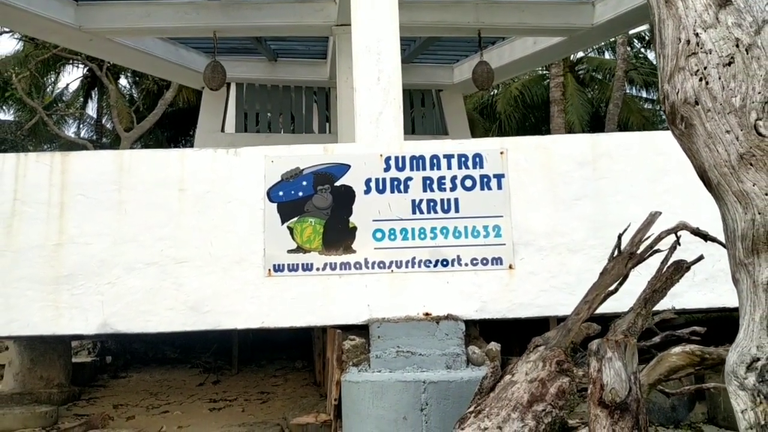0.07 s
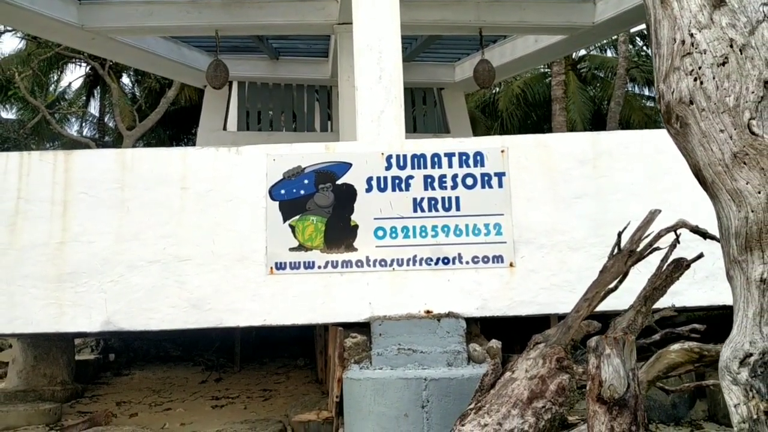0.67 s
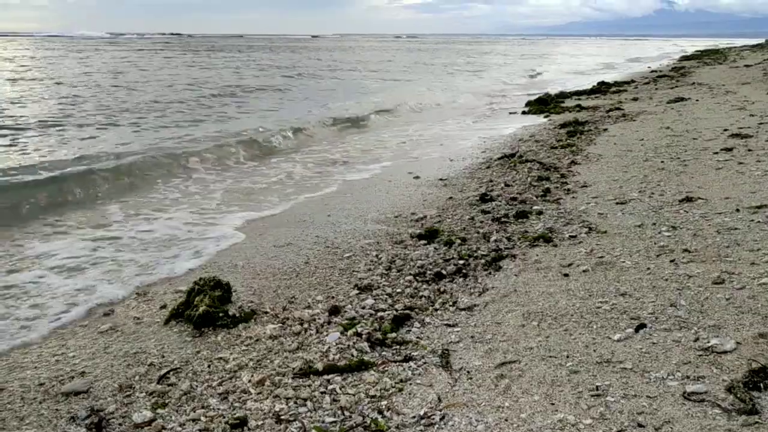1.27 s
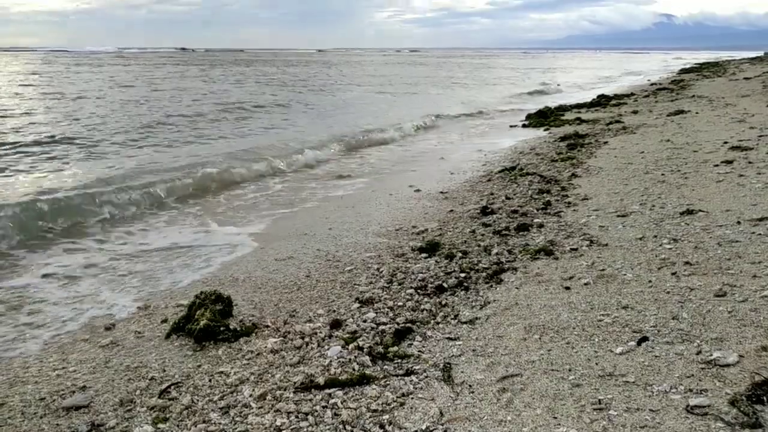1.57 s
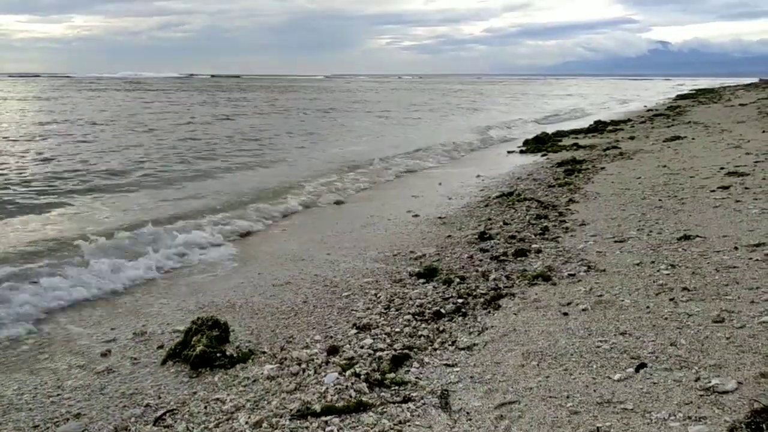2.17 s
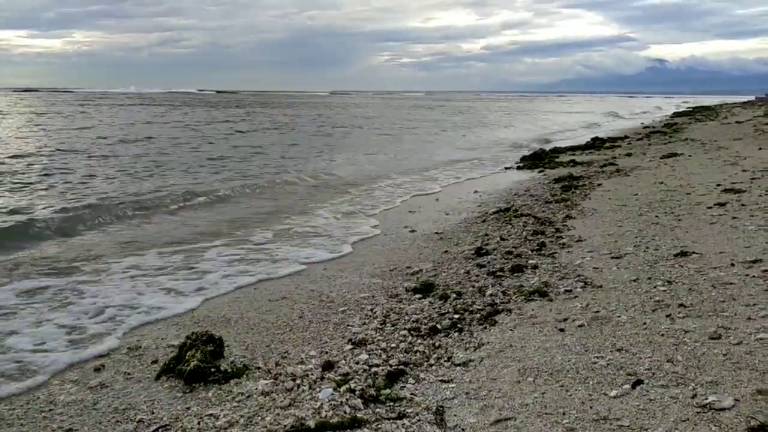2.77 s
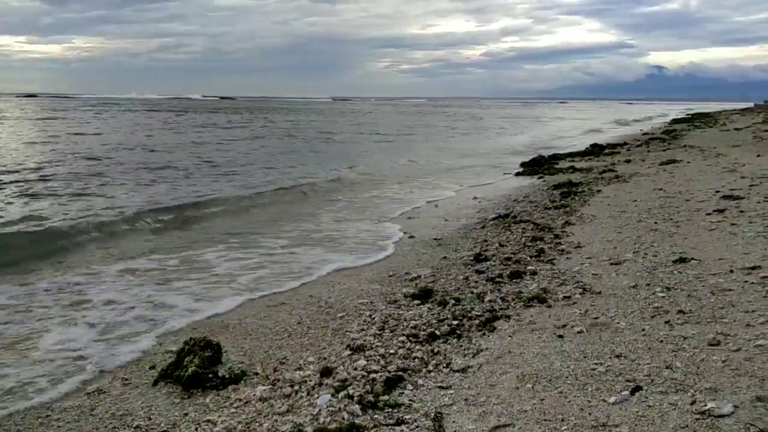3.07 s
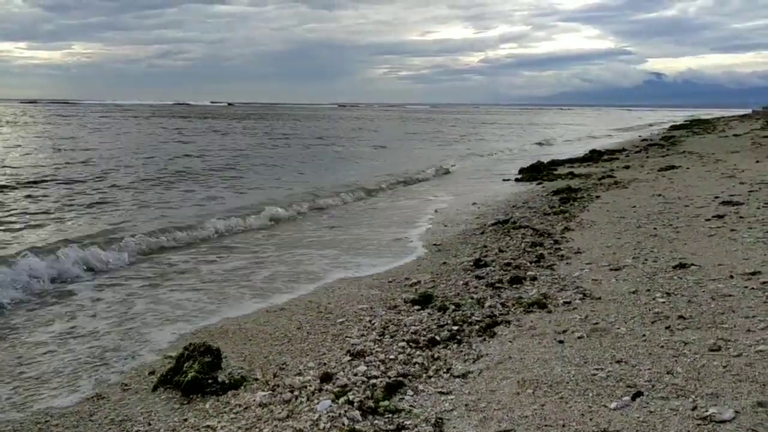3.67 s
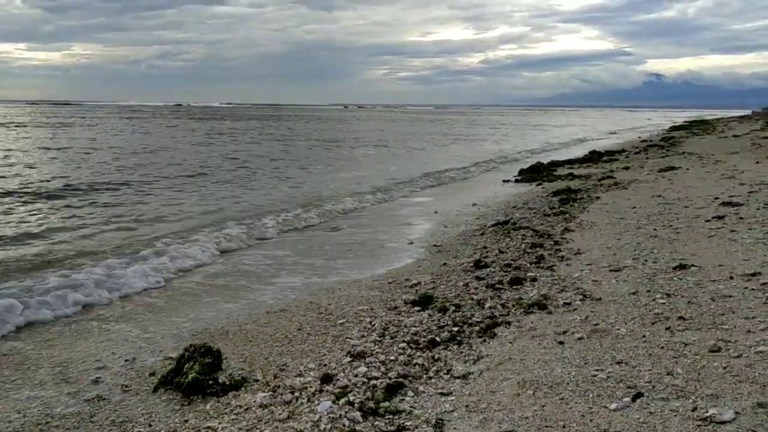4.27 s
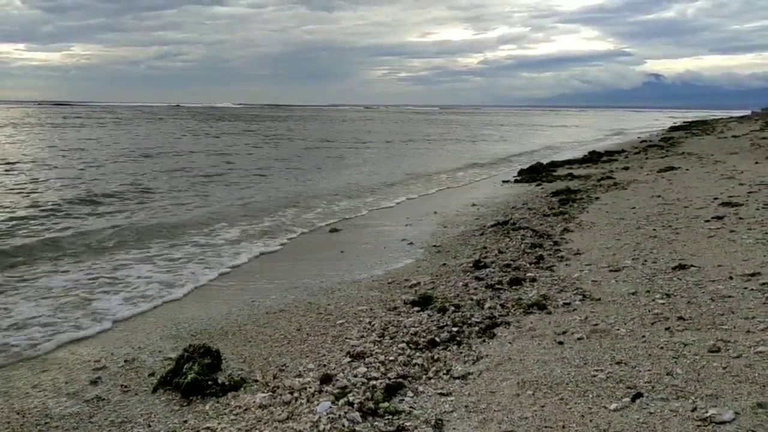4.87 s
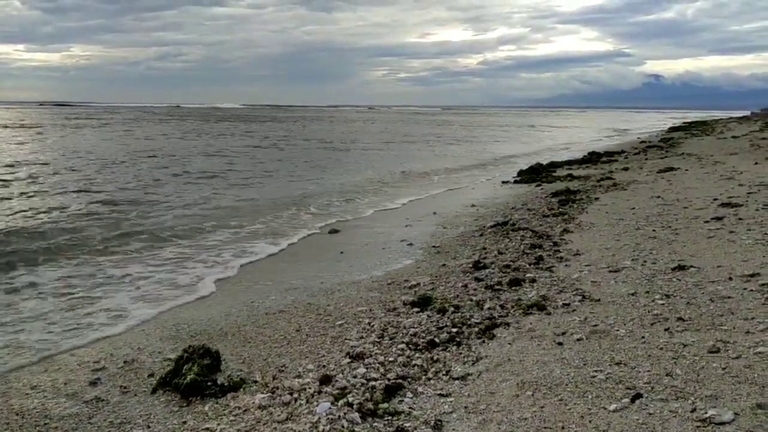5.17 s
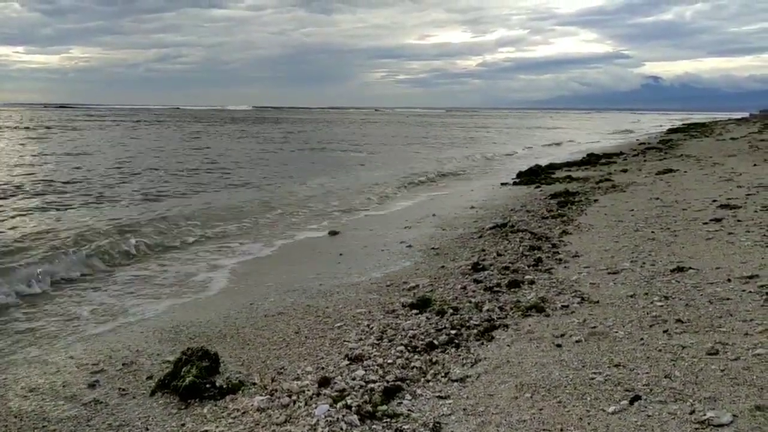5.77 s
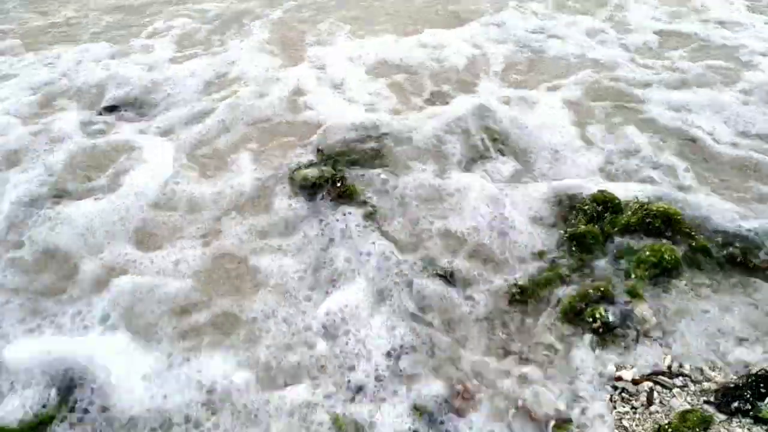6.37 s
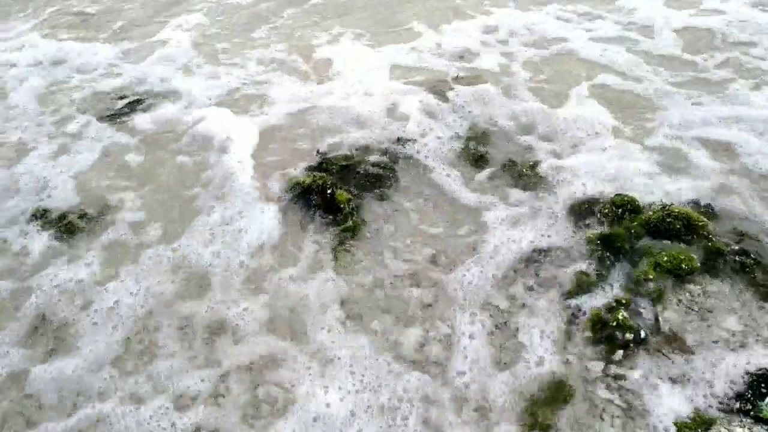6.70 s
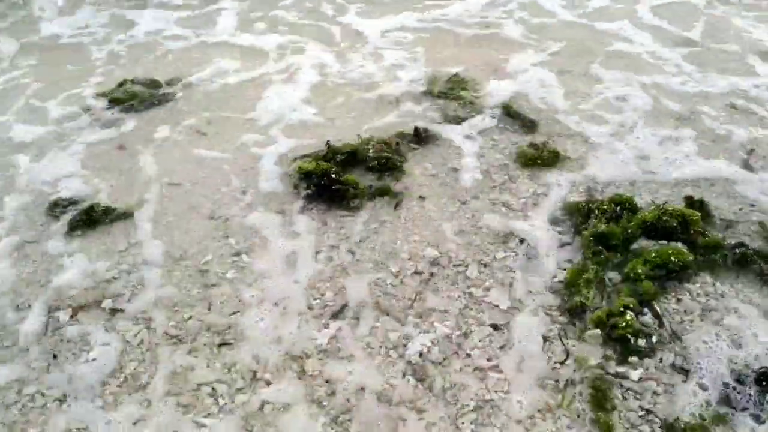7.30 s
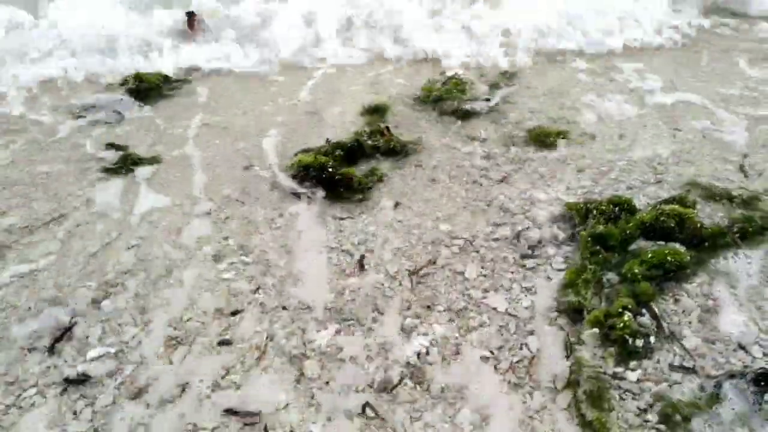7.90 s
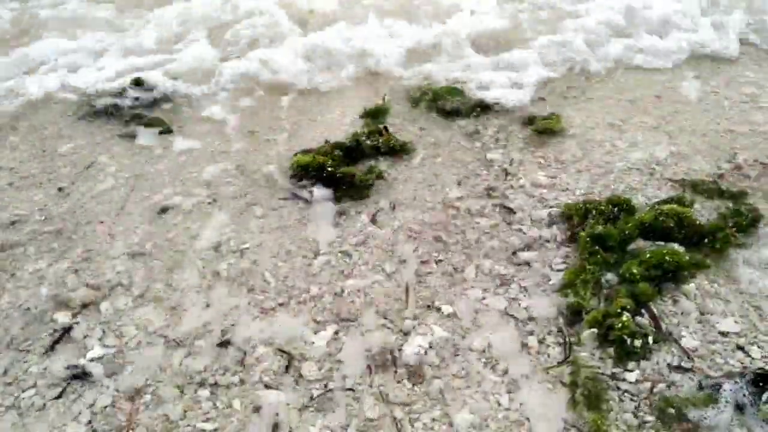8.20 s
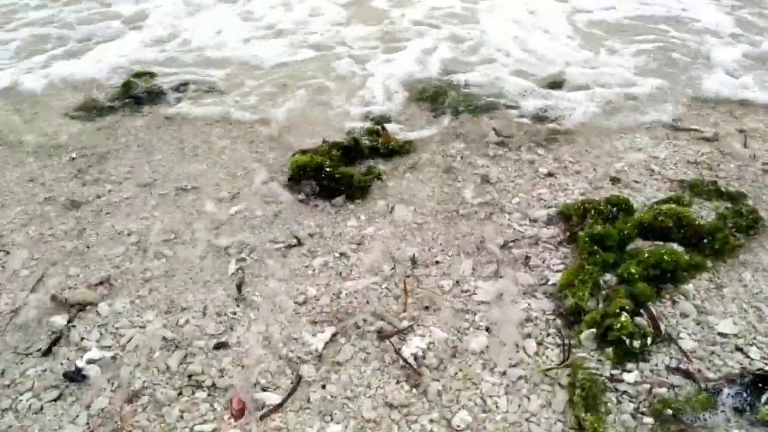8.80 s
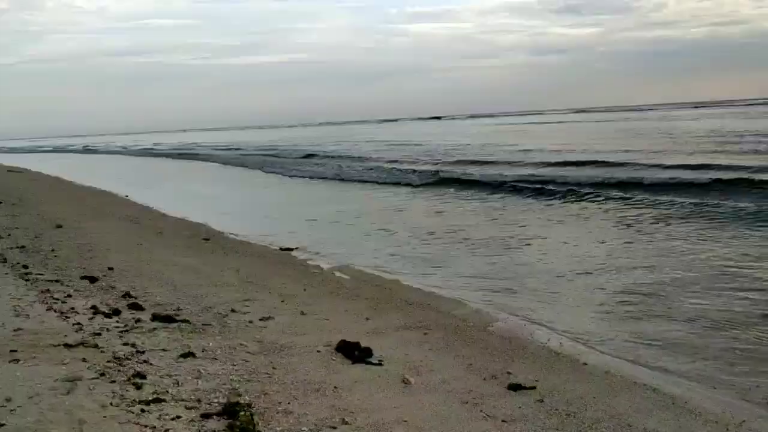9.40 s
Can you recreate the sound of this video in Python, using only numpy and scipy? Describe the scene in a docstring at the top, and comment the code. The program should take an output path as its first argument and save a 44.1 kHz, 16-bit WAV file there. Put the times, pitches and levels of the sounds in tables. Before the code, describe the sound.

For the first second or so, low gusts of wind buffet the microphone under a thin, high hiss. At about 1.2 seconds the sound cuts to a spot a few steps from the water on a shell beach. A small wave breaks at around 1.5 seconds, churns and runs out as fizzing foam. A second spills from 3 to 4 seconds with wet slaps and a gulp, and a softer one follows between 5 and 6. Just after 6.2 seconds there is a very short hush, and the water returns right below the microphone. Two waves land one on the other from about 7 to 7.7 seconds, the fullest moment, with low thuds, splashes and hollow gulps, then drain away hissing. A gentler wave washes in at around 9 seconds, and the sound fades quickly after 9.5. Far surf and wind rumble faintly underneath, all in mono.

```python
"""Small waves on a shell beach

Heard in mono from three places in turn: by the palms, where wind buffets the microphone under a thin
hiss, then a few steps from the water, then right above the waves as they run up the shore. Each wave
spills at its crest, plunges, churns and runs out as fizzing foam, all made of ringing bubbles and noise.
Falling water slaps and thuds, trapped air gulps, and far surf and wind rumble underneath."""
import sys
import numpy as np
from scipy import signal
from scipy.fft import rfft, irfft
from scipy.io import wavfile
from scipy.ndimage import uniform_filter1d

SR = 44100
rng = np.random.default_rng(int(sys.argv[2]) if len(sys.argv) > 2 else 0)


def write(x):
    x = np.atleast_2d(x).T
    wavfile.write(sys.argv[1], SR, np.round(np.clip(x, -1, 1) * 32767).astype(np.int16))


N = 425565
TIME, HZ = np.arange(N) / SR, np.fft.rfftfreq(N, 1 / SR)

# pitch ranges of a wave's four stages (plunge, churn, spill, foam): low f/Hz, high f/Hz
STAGE_BANDS = [(170, 400), (420, 1400), (1600, 3000), (4000, 15000)]


def gain_of(db):
    """Turns decibels into a number to multiply a sound by."""
    return 10 ** (np.asarray(db) / 20)


def evened(x):
    """Scales a signal so that its average strength (rms) is 1."""
    return x / np.sqrt(np.mean(x ** 2) + 1e-20)


def add(mix, start_s, sound):
    """Mixes a sound in at the given time."""
    part = mix[round(start_s * SR):][:len(sound)]
    part += sound[:len(part)]


def coloured(x, colour, band=(0, SR)):
    """Shapes x by a tone colour (rows of f/Hz, level/dB), with strength 1 inside the band."""
    f, db = np.transpose(colour)
    knots = np.log(np.r_[f[0] / 2, f, f[-1] * 2])
    spectrum = rfft(x) * gain_of(np.interp(np.log(HZ + 1), knots, np.r_[db[0] - 40, db, db[-1] - 40]))
    inside = (HZ >= band[0]) & (HZ <= band[1])
    return irfft(spectrum, N) * N / np.sqrt(2 * np.sum(abs(spectrum[inside]) ** 2))


def wander(rate_hz):
    """A random wobble of strength 1, up to about the given rate."""
    return evened(irfft(rfft(rng.standard_normal(N)) * (HZ > 2) / (1 + (HZ / rate_hz) ** 2), N))


def palm_wind():
    """Wind and far surf by the palms; each gust on the microphone is a big swirl that breaks up."""
    # tone colour of the wind and surf: f/Hz, level/dB
    colour = [(20, 2), (50, -6), (90, -0.5), (130, -5), (185, -3), (250, -4), (500, -10), (800, -13.5),
              (1000, -16), (1800, -19.5), (2600, -20), (3600, -28), (6000, -35), (15000, -37.5)]
    # the strongest gusts: peak t/s, level/dB, f/Hz, half length/s
    gusts = [(.056, -34, 100.5, .029), (.155, -31, 87, .021), (0.288, -30, 80.7, 0.018),
             (0.375, -29, 94.3, 0.017), (0.504, -29, 110, 0.017), (0.697, -32, 129.5, .034),
             (0.92, -30.5, 174, 0.1), (1.05, -33, 170, .02), (1.147, -27.5, 70.3, 0.045)]
    wind = gain_of(-34) * coloured(rng.standard_normal(N), colour) * gain_of(0.94 * wander(28))
    swirl_time = np.cumsum(1 + 0.285 * wander(60)) / SR  # an uneven clock makes the pitch waver
    flutter = coloured(rng.standard_normal(N), [(40, 8), (200, 2), (400, -2), (800, -17)])
    for peak_s, db, hz, length in gusts:
        near = slice(max(round((peak_s - 4 * length) * SR), 0), round((peak_s + 4 * length) * SR))
        swell = gain_of(db) * np.exp(-.5 * ((TIME[near] - peak_s) / length) ** 2)
        wind[near] += swell * (0.9 * np.sin(2 * np.pi * hz * swirl_time[near]) + 0.37 * flutter[near])
    return wind


def palm_hiss():
    """A thin, ringing hiss by the palms that swells, holds and sinks back a little."""
    # pitches at which the hiss rings: f/Hz, width/Hz, level/dB
    rings = [(2580, 230, 0), (3460, 260, 0), (4360, 300, -2.5), (5680, 820, -4), (6730, 320, -4),
             (7400, 300, -8), (8240, 400, -3), (9700, 500, -3.5), (10600, 380, 0), (11000, 199.6, -14),
             (12150, 500, -8.5), (13250, 450, -19), (15000, 600, -9)]
    power = sum(gain_of(db) ** 2 / (1 + (2 * (HZ - hz) / width) ** 2) ** 0.99 for hz, width, db in rings)
    hiss = evened(irfft(rfft(rng.standard_normal(N)) * np.sqrt(power), N)) * gain_of(1.3 * wander(25))
    rise_db = 130 * np.maximum(0.27 - TIME, 0)
    fall_db = np.clip(90 * (TIME - .98), 0, 5)
    return gain_of(-44.5 - rise_db - fall_db) * sand_echo(hiss, delay_s=.004, sway=.06, share=.5)


def sand_echo(x, delay_s, sway, share):
    """The sandy ground throws a sound back a moment later, along a path that slowly shifts."""
    late = delay_s * (1 + sway * np.sin(2 * np.pi * TIME / 2))
    return (x + share * np.interp(TIME - late, TIME, x)) / np.sqrt(1 + share ** 2)


def rumble():
    """Far surf and lumpy wind on the microphone, heard down by the water."""
    # tone colour of the rumble: f/Hz, level/dB
    colour = [(20, -4), (45, -1.5), (85, -0.5), (170, -1), (250, -6.5), (390, -12.5), (560, -12.5),
              (760, -19), (1000, -22.5), (1400, -29.5), (2300, -27.5), (5000, -46), (9200, -27.5),
              (12500, -32.5), (15300, -36)]
    # the wind freshens and eases: t/s, level/dB
    levels = [(1.2, -46.5), (2.9, -47.5), (3.4, -45), (4.5, -48), (5.2, -45.5), (6.2, -45), (6.5, -49),
              (9.5, -46)]
    low = coloured(rng.standard_normal(N), colour, STAGE_BANDS[0]) * gain_of(0.4 * wander(12))
    return gain_of(np.interp(TIME, *np.transpose(levels))) * low


def spurts(per_s, decay_s):
    """Water lands in clumps: a wobble of quick rises that die away."""
    kicks = rng.exponential(1, N) * (rng.random(N) < per_s / SR)
    tails = signal.lfilter([1], [1, -np.exp(-1 / (decay_s * SR))], kicks)
    heap = uniform_filter1d(tails, size=160)
    return evened(heap - uniform_filter1d(heap, SR // 6))


def bubbles(band, per_s, cycles, spread_db, rise):
    """A cloud of bubbles in and around a band; each rings for a few cycles and rises in pitch."""
    start, pitch, chance = rng.random((int(per_s * N / SR), 3), dtype=np.float32).T[:, :, None]
    lowest, highest = band[0] * .6, band[1] * 1.3
    hz = lowest + pitch * (highest - lowest)
    turns = hz * np.arange(int(2 * cycles * SR / band[0]), dtype=np.float32) / SR
    age = turns / float(cycles)
    strength = np.float32(gain_of(spread_db * np.minimum(-np.log(1 - chance), 4))) * np.sqrt(hz)
    rings = strength * np.exp(-age) * np.sin(2 * np.pi * turns * (1 + float(rise) * age))
    samples = (start * N).astype(int) + np.arange(turns.shape[1])
    return evened(np.bincount(samples.ravel(), rings.ravel(), N)[:N])


def water(band, per_s, cycles, spread_db, rise, blur_db):
    """Near bubbles stand out of the noisy blur of countless far ones."""
    return bubbles(band, per_s, cycles, spread_db, rise) + gain_of(blur_db) * rng.standard_normal(N)


def wave_stages():
    """Plunge, churn, spill and foam: ever smaller bubbles, all shaken by the same spurts."""
    clumps = spurts(per_s=80, decay_s=0.017)
    plunge = water(STAGE_BANDS[0], per_s=200, cycles=2.66, spread_db=1.0, rise=0.023, blur_db=11.5)
    churn = water(STAGE_BANDS[1], per_s=1100, cycles=4.1, spread_db=0.5, rise=0.018, blur_db=6)
    plops = gain_of(-13) * bubbles((610, 710), per_s=30, cycles=4.5, spread_db=0.0, rise=.015)
    spill = water(STAGE_BANDS[2], per_s=3000, cycles=4.05, spread_db=2.0, rise=0.015, blur_db=5.5)
    foam = water(STAGE_BANDS[3], per_s=5000, cycles=1.8, spread_db=2.0, rise=0.0092, blur_db=1.0)
    return [plunge * gain_of(.7 * clumps + 1.3 * wander(18)),
            (churn + plops) * gain_of(0.25 * clumps + .5 * wander(22)),
            spill * gain_of(0.41 * clumps + 0.21 * wander(25)),
            foam * gain_of(0.83 * clumps + 0.19 * wander(25))]


def surge(waves, stage):
    """Loudness of one stage: it starts as a crest tips, builds until the wave lands, holds and fades."""
    # how each stage follows a wave: lag/s, onset/(dB/s), build-up/dB, lateness (1 = even), fade factor
    rules = [(0, 80, 13, 0.65, 1.3), (0.078, 80, 12.5, 1.3, 1.06), (0.032, 116, 3.5, 1.3, 1.02),
             (0.036, 59, 7, 2.6, 0.89)]
    lag, onset, build_db, lateness, fade_factor = rules[stage]
    t, power = np.linspace(0, N / SR, N // 128), 0
    for tips, build_s, hold_s, fade, *stage_db in waves:
        lands = tips + build_s + lag
        built = np.interp(t, [tips, lands], [0, 1]) ** lateness
        rise_db = build_db * (1 - built) + onset * np.maximum(tips - t, 0)
        fall_db = fade * fade_factor * np.maximum(t - lands - hold_s, 0)
        power = power + gain_of(stage_db[stage] - rise_db - fall_db) ** 2
    return np.interp(TIME, t, np.sqrt(power))


def surf(stages, waves, colours, rest_db):
    """Each stage swells above the resting wash as the waves come in."""
    return sum(np.hypot(surge(waves, k), gain_of(rest_db[k])) * coloured(stages[k], colours[k], band)
               for k, band in enumerate(STAGE_BANDS))


def beach_waves(stages):
    """Waves break a few steps away, with a faint echo off the sand."""
    # crest tips t/s, time to land/s, hold/s, base fade/(dB/s), plunge/dB, churn/dB, spill/dB, foam/dB
    waves = [(.4, .3, 0.75, 25, -53, -47.5, -53, -53.5), (1.419, 0.17, .24, 33, -37.5, -36.5, -37.5, -37),
             (2.983, 0.28, .44, 19, -42.5, -39.5, -40.5, -39.5),
             (5.184, 0.078, 0.29, 21, -49.5, -54, -44.5, -47), (5.4, .13, 0.43, 29, -51, -47, -48.5, -50.5)]
    # a tone colour for each stage: f/Hz, level/dB
    colours = [
        [(90, -23), (130, -8.5), (220, -3), (290, -5.5), (380, -10.5), (500, -25.5)],
        [(280, -23.5), (400, -8.5), (530, -2), (720, -4.5), (870, -7), (1050, -8), (1350, -13.5), (1800, -17),
         (2600, -41)],
        [(1100, -28.5), (1450, -8.5), (1900, -1.5), (2300, 1.8), (2650, -1.5), (3000, -10), (3650, -12.5),
         (4400, -10), (6000, -41)],
        [(2400, -12.5), (3500, 2), (4800, -2.5), (5350, -1), (6200, -3), (6900, 1), (8000, -1.5), (9150, 2),
         (9900, -0.5), (10900, 0), (12700, -5), (14600, -7.8), (15400, -7.8)],
    ]
    # the wash left between waves: plunge/dB, churn/dB, spill/dB, foam/dB
    rest_db = [-52.5, -60.5, -66, -57]
    return sand_echo(surf(stages, waves, colours, rest_db), delay_s=.0023, sway=0.1, share=0.048)


def slaps():
    """Falling water hits water, each time with a short burst of noise."""
    # the loudest slaps: t/s, relative level/dB, centre f/Hz, width/octaves, decay/s
    hits = [(1.385, -36, 9050, 0.43, 0.067), (1.439, -27.5, 9080, 0.39, 0.0056),
            (2.89, -48, 2370, .23, 0.045), (3.195, -33, 8860, .36, 0.05), (3.226, -29, 2010, .27, 0.0058),
            (3.338, -27, 2040, .29, 0.0069), (3.374, -30, 2210, 0.26, 0.027),
            (3.595, -31.5, 2190, .28, 0.016), (4.495, -40, 700, .54, 0.0076),
            (5.2337, -40, 9700, 0.24, 0.021), (5.305, -39, 10000, .22, .02),
            (5.505, -33.5, 810, 0.16, 0.0083), (6.678, -36, 8540, .63, .023),
            (7.16, -32.5, 8500, 0.65, 0.044), (7.204, -31.5, 2000, .5, .012),
            (7.315, -32, 1080, 0.16, 0.059), (7.39, -25.5, 620, 0.27, 0.03), (9.226, -36, 3500, 1, .025),
            (9.243, -29, 980, .35, 0.031)]
    out, t = np.zeros(N), np.arange(SR // 2) / SR
    f = np.fft.rfftfreq(len(t), 1 / SR)
    for start_s, db, hz, octaves, decay in hits:
        hump = np.exp(-.5 * (np.log2((f + 1) / hz) / octaves) ** 2)
        spray = evened(irfft(rfft(rng.standard_normal(len(t))) * hump, len(t)))
        bloom = 1 - np.exp(-t / (0.2 * decay))  # a longer splash also builds up more slowly
        add(out, start_s, gain_of(db + 2.0) * spray * bloom * np.exp(-t / decay))
    return out


def gulps():
    """Big pockets of trapped air ring briefly, rising a little in pitch."""
    # the largest air pockets: t/s, level/dB, f/Hz, decay/s
    pockets = [(1.694, -26, 500, .012), (3.539, -19.5, 620, 0.0068), (4.435, -30, 537, 0.0066),
               (5.693, -27, 624, .0072), (5.818, -22.5, 473, .0063), (6.93, -19, 487, 0.0071),
               (6.973, -25, 756, 0.0075), (7.202, -16, 155.9, .018), (7.208, -21.5, 94, .03),
               (7.335, -24.5, 538, 0.02), (7.505, -21.5, 287, .018), (7.562, -15.5, 244, .021),
               (9.432, -27, 618, 0.017)]
    out, t = np.zeros(N), np.arange(SR // 2) / SR
    for start_s, db, hz, decay in pockets:
        ring = np.sin(2 * np.pi * hz * t * (1 + 0.97 * t)) * (1 - np.exp(-t / .0035))
        add(out, start_s, gain_of(db) * ring * np.exp(-t / decay))
    return out


def close_waves(stages):
    """Waves land with a thud and run up to the microphone; the third rides in on the second."""
    # crest tips t/s, time to land/s, hold/s, base fade/(dB/s), plunge/dB, churn/dB, spill/dB, foam/dB
    waves = [(5.7, .3, 0.67, 20, -60, -55.5, -50.5, -42.5),
             (6.718, 0.41, 0.12, 18.3, -36.5, -35.3, -40, -35.5),
             (7.44, 0.12, .14, 34, -36, -32.5, -42, -33.5), (8.82, .43, .28, 17, -42.5, -38, -43, -40)]
    # a tone colour for each stage: f/Hz, level/dB
    colours = [
        [(55, -15), (100, -4), (160, -3.5), (210, 0), (255, -1), (320, -3.5), (390, -9.5), (500, -10)],
        [(300, -5.5), (420, -12.5), (540, -2.5), (720, -1.5), (900, -8), (1030, -6.5), (1230, -11), (1400, -9),
         (1700, -22), (2600, -13.5), (3300, -11), (4200, -12), (6500, -25)],
        [(1100, -14), (1500, 0), (1750, 4), (2050, 4), (2450, 2.5), (2880, -25), (3250, -14), (4300, -27),
         (6000, -39)],
        [(2400, -7), (3200, -3), (4300, -3), (5100, -6), (6100, -2), (7200, 0.5), (8700, 2.5), (10300, -0.5),
         (12200, -8), (13400, -9), (15200, -7)],
    ]
    # the wash left between waves: plunge/dB, churn/dB, spill/dB, foam/dB
    rest_db = [-48, -57.5, -55, -50.5]
    wash = surf(stages, waves, colours, rest_db)
    return sand_echo(wash, delay_s=.002, sway=0.093, share=0.078) + thud(waves)


def thud(waves):
    """The weight of water landing close by; it grows faster than the plunge."""
    # tone colour of the thud: f/Hz, level/dB
    colour = [(30, -9), (60, -2), (90, 0), (140, -1), (220, -6)]
    full_plunge = gain_of(-36)
    weight = (surge(waves, stage=0) / full_plunge) ** 1.9
    return gain_of(-37.5) * weight * coloured(rng.standard_normal(N), colour)


def scene():
    """The three places follow one another; a short hush comes before the last, which fades in and out."""
    leave_palms_s, leave_beach_s, reach_close_s, leave_close_s = 1.181, 6.222, 6.315, 9.54
    stages = wave_stages()
    shore = rumble() + slaps() + gulps()
    beach = beach_waves(stages) + shore
    beach *= np.clip((leave_beach_s - TIME) / 0.0081, 0, 1) ** 2
    close = close_waves(stages) + shore
    close *= np.clip((TIME - reach_close_s) / 0.17, 0, 1) ** 2.44
    close *= gain_of(-101 * np.maximum(TIME - leave_close_s, 0))
    mono = np.where(TIME < leave_palms_s, palm_wind() + palm_hiss(), beach) + close
    hush = coloured(rng.standard_normal(N), [(30, 5), (500, -7), (1500, -26), (15000, -26.5)])
    mono += gain_of(-94.0) * hush
    return np.array([mono, mono])


def record(dry):
    """Cuts away the very highest treble."""
    top_hz = 15560
    low_pass = signal.firwin(511, top_hz, window=("kaiser", 9), fs=SR)
    return signal.oaconvolve(dry, low_pass[None], "same")


dry = scene()
out = record(dry)
write(out)
```